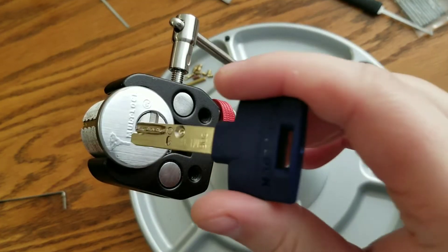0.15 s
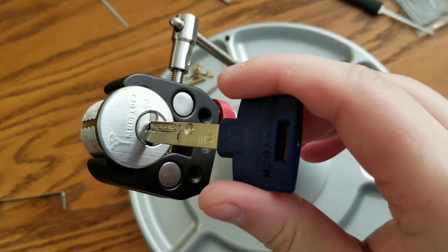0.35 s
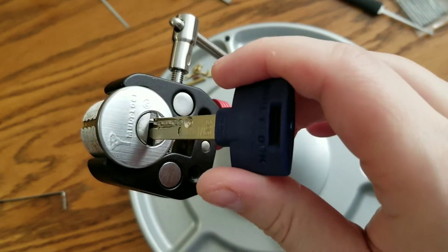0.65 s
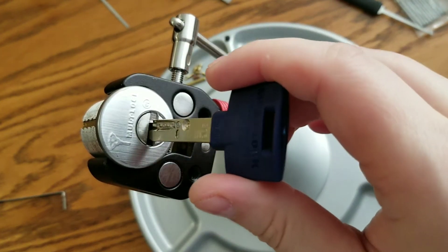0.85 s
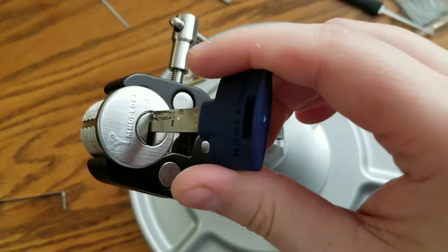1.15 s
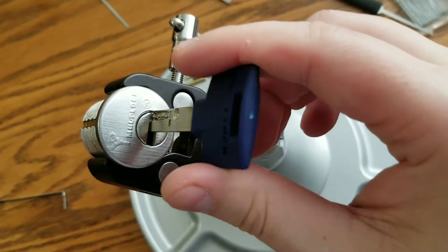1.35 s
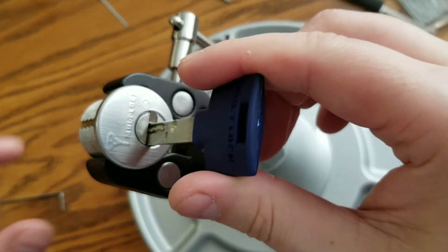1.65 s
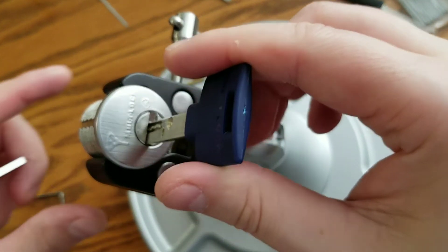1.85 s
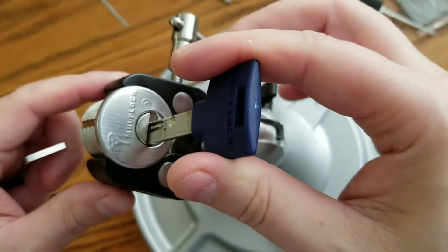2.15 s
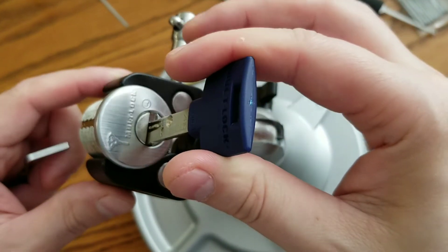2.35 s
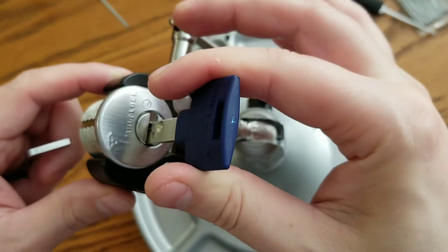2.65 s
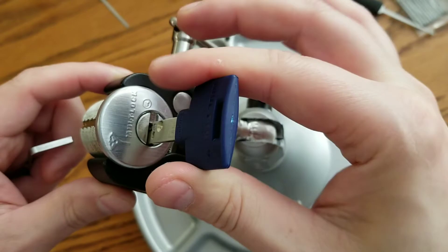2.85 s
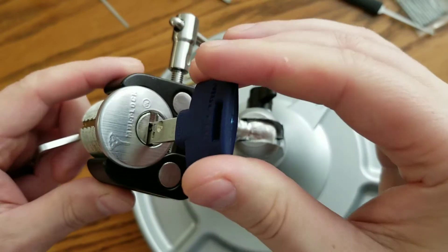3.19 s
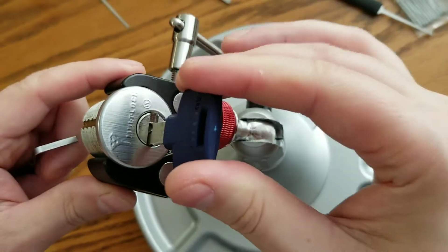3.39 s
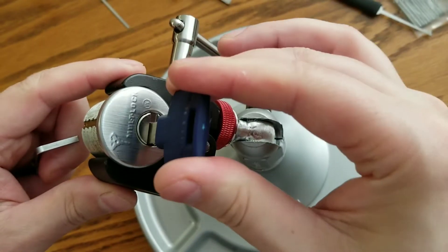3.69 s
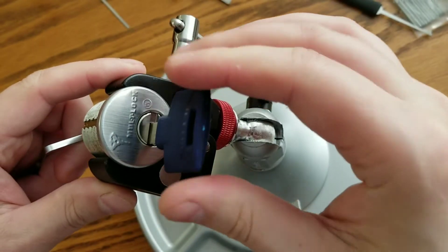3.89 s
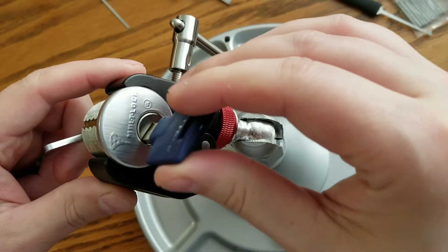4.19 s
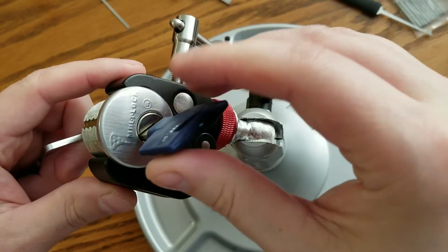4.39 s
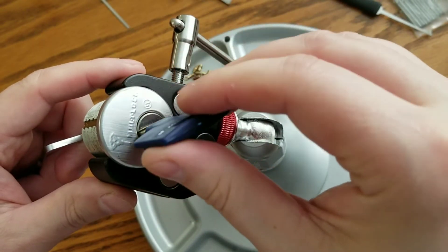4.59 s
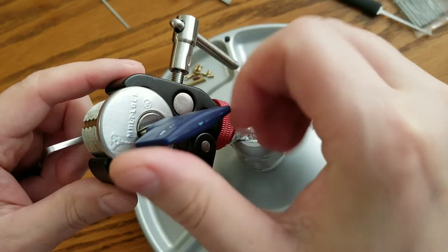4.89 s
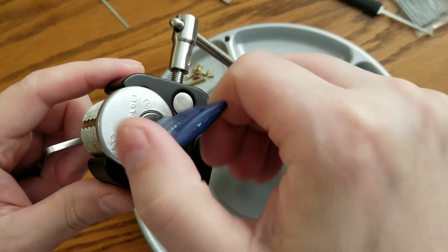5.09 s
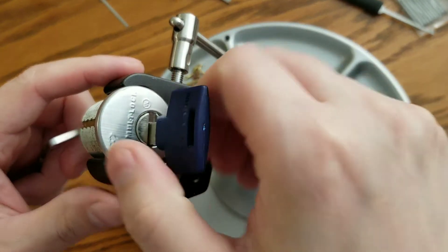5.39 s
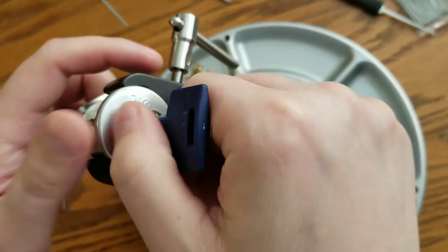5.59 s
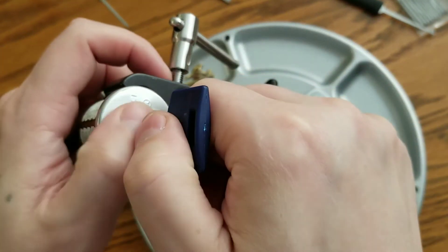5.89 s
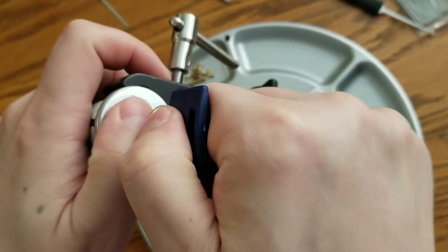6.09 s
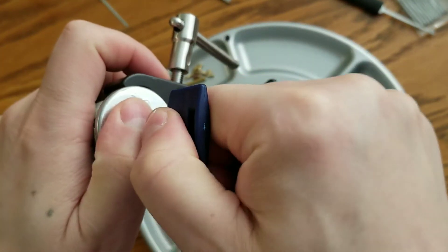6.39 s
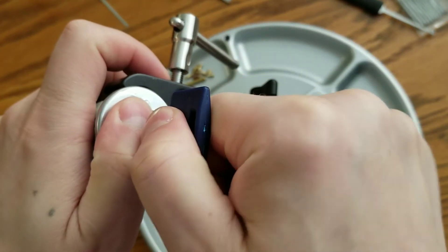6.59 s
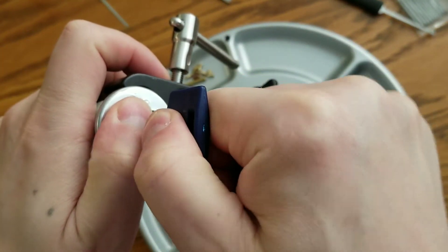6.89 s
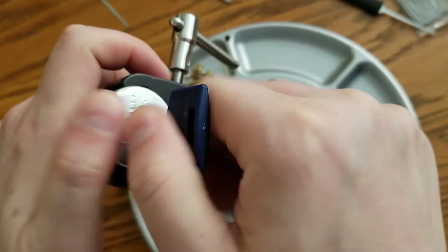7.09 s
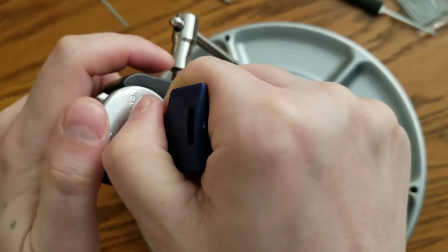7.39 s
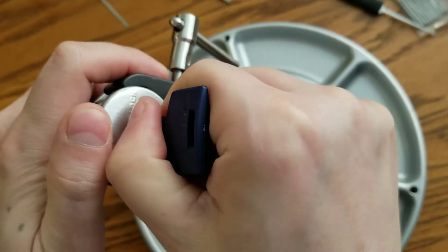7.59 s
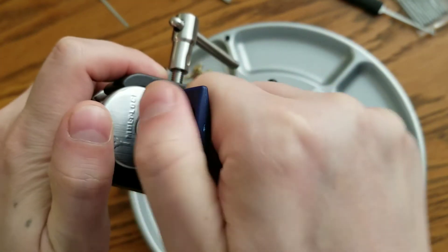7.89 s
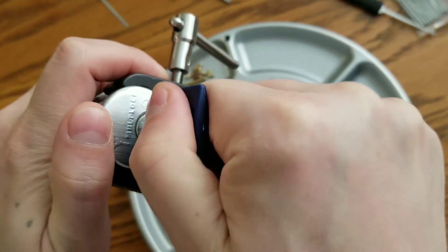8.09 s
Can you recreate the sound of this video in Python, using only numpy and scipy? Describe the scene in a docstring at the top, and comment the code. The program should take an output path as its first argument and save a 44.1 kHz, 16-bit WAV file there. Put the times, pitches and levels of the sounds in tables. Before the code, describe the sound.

Close stereo pickup in a small room: a brass key enters a lock cylinder in a small vise with isolated crisp clicks, then tight bursts of hard metallic snaps and knocks around the middle. Sparse softer ticks and grip creaks follow. Each bright snap has a short room tail; a faint low hum and hiss continue behind.

```python
"""In a small room, a brass key is pushed into a pin cylinder in a small vise, turned and jiggled close by.
Key and pins click as short bursts of damped modes; the vise rings duller and longer and sways on its stand.
Fingers and metal rub as grainy noise, slips creak faintly and a tiny spring pings once.
Decaying noise bands form the room's answer; behind are a low hum, thin whine and hiss,
whose level is raised and lowered along a tabled gain curve."""
import sys
import numpy as np
from scipy import signal
from scipy.fft import rfft, irfft
from scipy.io import wavfile

SR = 44100
rng = np.random.default_rng(int(sys.argv[2]) if len(sys.argv) > 2 else 0)


def generate_wav(sig):
    """Save sig (samples, or channels by samples) to the path in sys.argv[1] as 16-bit PCM at SR."""
    pcm = np.round(np.clip(np.atleast_2d(sig).T, -1, 1) * 32767).astype(np.int16)
    wavfile.write(sys.argv[1], SR, pcm)


N = 363825
TIME = np.arange(N) / SR

# gain curve of the whole background, before BACKGROUND_DB: time_s, level_db
BACKGROUND_GAIN = [(0.0, -52.5), (1.03, -47.5), (2.57, -48.5), (2.87, -53), (3.45, -51.5), (3.7, -59),
                   (5.68, -58), (6.64, -48), (8.25, -47.5)]
# tones of the hum, level relative to the gain curve: frequency_hz, level_db
HUM_TONES = [(59, -12.5), (119, 0), (163, -4.5), (220, -13.5), (296, -15), (1126, -22)]
# relative spectra of the rumble and of the hiss: frequency_hz, density_db
RUMBLE_SPECTRUM = [(20, -26), (45, -7.5), (85, -6.5), (130, -2.5), (210, -5.5), (300, -12), (400, -17),
                   (500, -19), (700, -26), (950, -34.5), (1400, -38.5), (2500, -44.5), (5000, -47),
                   (9000, -62)]
HISS_SPECTRUM = [(1200, -4), (2500, -6), (6300, -6), (8400, -14), (10000, -6), (11800, 0), (14600, -.5)]
# relative spectrum of sliding friction: frequency_hz, density_db
FRICTION_SPECTRUM = [(500, -8.0), (1200, -13.5), (2200, -2.5), (3600, -8.5),
                     (5500, -6.5), (8000, -6.5), (12500, 4), (15000, 0.0)]
# likeness of left and right noise, limited to -1..1 in use: frequency_hz, coherence
COHERENCE = [(60, 0.3), (130, 0.76), (290, 0.88), (640, 0.22), (1400, -1.15), (3000, 0.5)]
# decay and relative strength of the room's reflections: frequency_hz, t60_s, level_db
ROOM_BANDS = [(400, 0.29, 2.5), (1530, .3, 4), (3293, 0.35, 0), (6170, 0.39, 3), (9200, 0.27, -6.5),
              (13930, .3, -2.5)]
# free modes of a small spring, relative levels: frequency_hz, level_db, t60_s
SPRING_MODES = [(9518, -19, .1), (10940, -19, .12), (12590, 0, .1), (14520, -1, .07)]
# the stand sways after a shove, or the key bottoms out in a short low thud; level before decay: start_s,
# pitch_hz, level_db, t60_s
LOW_THUMPS = [(2.595, 132.8, -36.5, 0.45), (3.366, 106.6, -38, .3), (3.421, 129.8, -39.5, 0.24),
              (3.565, 133.7, -31, .24), (3.562, 61.4, -34, 0.051), (4.151, 72, -36.5, 0.063),
              (6.87, 122, -27.5, 0.12)]
# the shifting grip keeps the parts creaking: start_s, end_s, slips_per_s
FIDGETS = [(0.949, 2.058, 10), (7.057, 7.542, 16), (7.755, 8.235, 24)]
# strokes of metal and skin sliding: middle_s, half_length_s, level_db
RUBS = [(1.482, 0.04, -60.5), (2.593, .016, -35), (3.382, 0.017, -40), (3.573, 0.011, -33),
        (5.206, 0.037, -66), (6.14, 0.032, -66.5), (6.427, 0.023, -67.5), (7.123, 0.03, -61.5),
        (7.9, 0.028, -58.5), (7.956, 0.057, -62)]
# modes of the vise clamp and of the cylinder housing, relative levels: frequency_hz, level_db, t60_s
CLAMP_MODES = [(335, -12, .05), (420, -12, .04), (530, -5, .09), (620, 0, .08), (690, -1, .035),
               (770, -6, .025), (848, -6, .06), (935, -5, .03), (1040, -7, .02)]
HOUSING_MODES = [(1400, -14, .04), (1762, -3, .055), (1820, -1, .03), (1920, -2, .03), (2020, -1, .025),
                 (2200, -1, .02), (2440, -2, .02), (2575, -2.5, .035), (2680, -3, .025), (2850, -5, .02),
                 (3090, -9, .025), (3610, -13, .025), (3910, -13, .025)]
# the key rocks in the keyway and knocks dully: start_s, energy_db
KNOCKS = [(0.9614, -33.5), (1.0906, -32), (1.126, -36.5), (1.1635, -33), (1.445, -23), (1.8097, -31),
          (1.9172, -33.5), (2.505, -26.5), (2.523, -27), (2.9735, -31), (3.4477, -22), (3.563, -17),
          (4.162, -25), (5.2235, -25), (5.2565, -29.5), (5.37, -42), (5.665, -39), (5.92, -40),
          (7.0899, -29.5), (7.1129, -26), (7.3851, -29), (7.7853, -36.5), (7.845, -31), (7.872, -31.5),
          (7.9929, -30.5), (8.083, -26), (8.1535, -35)]
# how far the key is in, as a fraction of full depth: time_s, depth
KEY_DEPTH = [(0.3, 0.05), (1.5, 0.14), (2.55, 1), (3.55, 0.95)]
# modes of the key blade and of the pins, relative levels: frequency_hz, level_db, t60_s
BLADE_MODES = [(2920, -14, 0.001), (3850, -1, 0.0024), (5200, 4.5, 0.0045), (6060, -2, 0.015),
               (6840, -1.5, 0.015), (7730, 4, 0.0073), (8900, 4.5, 0.0024), (9970, -2, 0.014)]
PIN_MODES = [(10400, -4, .002), (11400, -3, .002), (12500, 0, .003), (13500, 1, .003), (14300, 4, .003)]
# the key snaps past a pin and jolts the vise: start_s, pin_energy_db, blade_energy_db, vise_energy_db
SNAPS = [(0.3662, -34, -27, -24.5), (0.6382, -8.5, -12, -16.5), (0.9425, -42, -31, -34),
         (1.4381, -27, -33.5, -18), (1.4917, -15, -29.5, -44), (1.4985, -8, -6.5, -16.5),
         (1.5016, -8.5, -16, -25.5), (1.6317, -23, -64, -33), (1.9363, -33, -36.5, -32.5),
         (1.9917, -25.5, -35.5, -32), (2.4874, -30, -34.5, -31), (2.5152, -25.5, -29, -46),
         (2.567, -17, -27, -20), (2.5735, -11, -31, -19.5), (2.5785, -12, -23, -15),
         (2.5927, -8.5, -19.5, -11), (2.6005, -34, -20, -15), (2.9275, -25.5, -32.5, -32),
         (3.3424, 3, -21.5, -19), (3.3537, -10, -17, -27), (3.362, -6, -22, -11.5),
         (3.4181, -11.5, -17, -18.5), (3.422, -5, -20, -8), (3.5441, 1.5, -21, -15),
         (3.5548, -5, -33, -21.5), (4.1496, -15, -37.5, -24), (4.3809, -36, -41.5, -46.5),
         (4.4013, -36.5, -40, -29.5), (4.752, -35, -39.5, -29), (5.0605, -25.5, -37.5, -27),
         (5.229, -20.5, -26.5, -33), (5.532, -30.5, -35, -59.5), (5.5904, -21.5, -24, -62),
         (7.1338, -25.5, -30.5, -29), (7.197, -12, -17, -37)]

BACKGROUND_DB = -5
HUM_PAN_DB, WHINE_PAN_DB, KEY_PAN_DB = -2.8, -8, 7      # positive is louder on the left
SPRING_S, SPRING_DB = 5.788, -27.5
PIN_CONTACT_S, JAW_CONTACT_S = .0009, .005
# housing against clamp: for a snap at zero depth, its rise at full depth, and for a dull knock
MOUTH_HOUSING_DB, DEEP_HOUSING_DB, KNOCK_HOUSING_DB = -6.5, 7, -3.5
PIN_ROOM_DB, BLADE_ROOM_DB = -9.5, -11.5
CUTOFF_HZ = 14650


def from_db(db):
    """Level: decibels become an amplitude gain."""
    return 10 ** (np.asarray(db) / 20)


def rms_one(x):
    """Normalisation: the root mean square becomes 1."""
    return x / np.sqrt(np.mean(x ** 2) + 1e-20)


def unit_energy(x):
    """Normalisation: the energy of each channel becomes 1."""
    return x / np.sqrt(np.sum(x ** 2, axis=-1, keepdims=True) + 1e-20)


def panned(pan_db):
    """Constant-power panning: left and right gains differ by pan_db."""
    return rms_one(from_db([[pan_db / 2], [-pan_db / 2]]))


def at_hz(points, hz, axis=1):
    """Interpolation: a table column is read along a log-frequency axis."""
    points = np.array(points)
    return np.interp(np.log(hz), np.log(points[:, 0]), points[:, axis])


def add(out, s, sound):
    """Superposition: a stereo sound is summed in at time s."""
    start = int(s * SR)
    out[:, start:start + sound.shape[1]] += sound[:, :N - start]


def drift(rate_hz):
    """Low-passed randomness: noise through a double pole at rate_hz wanders smoothly with spread about 1."""
    step = 40      # samples between the values drawn
    pole = np.exp(-2 * np.pi * rate_hz * step / SR)
    slow = signal.lfilter([1], [1, -2 * pole, pole ** 2], rng.standard_normal(N // step + 2002))
    slow = slow[2000:]      # the filter has settled
    return np.interp(np.arange(N) / step, np.arange(len(slow)), rms_one(slow))


def bands(low_hz, size):
    """Band analysis: half-octaves of two-channel noise as (centre Hz, noise), neighbours unrelated."""
    high_hz = 17000
    edges = np.geomspace(low_hz, high_hz, int(2 * np.log2(high_hz / low_hz)) + 1)
    white = rng.standard_normal((2, 2, size))
    for k, (low, high) in enumerate(zip(edges, edges[1:])):
        band_filter = signal.butter(2, [low, high], "band", fs=SR, output="sos")
        yield np.sqrt(low * high), signal.sosfilt(band_filter, white[k % 2])


def two_sides(mid, side, alike):
    """Coherence: common and opposed noise mix so that the two sides are correlated by alike."""
    return np.sqrt(1 + alike) * mid + np.sqrt(1 - alike) * side * [[1], [-1]]


def coloured_noise(spectrum):
    """Spectral shaping: stereo noise takes a given spectrum and the tabled coherence, at rms 1."""
    hz = np.fft.rfftfreq(N, 1 / SR) + 1
    mid, side = rfft(rng.standard_normal((2, N)))
    both = two_sides(mid, side, np.clip(at_hz(COHERENCE, hz), -1, 1))
    return rms_one(irfft(both * from_db(at_hz(spectrum, hz)), N))


def band_of(modes, x):
    """Radiation band: a part radiates from under its lowest mode to over its highest."""
    edges = [.85 * modes[0][0], 1.1 * modes[-1][0]]
    return signal.sosfilt(signal.butter(2, edges, "band", fs=SR, output="sos"), x)


def softened(modes, softness_db):
    """Contact stiffness: a gentle blow loses softness_db per octave above the lowest mode."""
    hz, level_db, t60 = np.transpose(modes)
    return np.column_stack([hz, level_db - softness_db * np.log2(hz / hz[0]), t60])


def strike(modes, contact_s, crack_db, length_s, vary_db, apart):
    """Modal excitation: a blow and its dying chatter drive damped modes and a broad crack, at energy 1."""
    t = TIME[:int(length_s * SR)]
    hz, level_db, t60 = np.transpose(modes)[:, :, None]
    hz = hz * (1 + 0.0068 * rng.standard_normal(hz.shape))      # the grip detunes every mode a little
    # each side hears its own mode strengths and phases
    strength_db = level_db + vary_db * rng.standard_normal((2, len(modes), 1))
    phase = rng.uniform(0, 2 * np.pi, (len(modes), 1)) + apart * rng.standard_normal((2, len(modes), 1))
    decay = from_db(strength_db - 60 * t / t60)
    ringing = np.sum(decay * np.sin(2 * np.pi * hz * t + phase), axis=1)
    ringing *= 1 - np.exp(-t * hz.min())      # the motion builds up over about a cycle
    chatter = rng.standard_normal(len(t)) + apart * rng.standard_normal((2, len(t)))
    force = unit_energy(chatter * np.exp(-t / contact_s)) + .5 * (t == 0)
    ringing = unit_energy(signal.fftconvolve(ringing, force, axes=1)[:, :len(t)])
    crack = unit_energy(band_of(modes, force))
    return unit_energy(ringing + from_db(crack_db) * crack)


def background(rumble_db=3, hiss_db=-20, whine_db=-25, whine_hz=1128, whine_width_hz=45,
               waver_db=1.0, lag_s=0.00014):
    """Common gain: rumble, slightly wavering tones, resonant whine and hiss follow one tabled gain curve."""
    gain = from_db(BACKGROUND_DB + np.interp(TIME, *np.transpose(BACKGROUND_GAIN)))
    tones = 0
    for hz, level_db in HUM_TONES:
        strength = from_db(level_db + waver_db * drift(7.7))
        tones = tones + strength * np.sin(2 * np.pi * hz * TIME + .7 * drift(2.2))
    rumble = from_db(rumble_db) * coloured_noise(RUMBLE_SPECTRUM)
    low = (rumble + np.sqrt(2) * tones) * panned(HUM_PAN_DB)
    low[1] = np.interp(TIME - lag_s, TIME, low[1])      # the hum reaches the left side first
    # noise through two equal resonances in a row
    peak = signal.iirpeak(whine_hz, whine_hz / whine_width_hz / 2, fs=SR)
    once = signal.lfilter(*peak, rng.standard_normal((2, N)))
    whine = from_db(whine_db) * rms_one(signal.lfilter(*peak, once)) * panned(WHINE_PAN_DB)
    hiss = from_db(hiss_db) * coloured_noise(HISS_SPECTRUM) * panned(1.5)
    return gain * (low + whine + hiss)


def room(x, build_s=0.0026, late_db=-23, alike_hz=900):
    """Reverberation: reflections thicken in milliseconds and die by band, over a faint tail twice as long."""
    t = TIME[:SR * 4 // 5]
    response = 0
    for hz, noise in bands(low_hz=200, size=len(t)):
        alike = np.exp(-(hz / alike_hz) ** 2)      # long waves reach both sides together
        noise = two_sides(noise[0], noise[1], alike)
        fall_db = -60 * t / at_hz(ROOM_BANDS, hz)
        decay = from_db(fall_db) + from_db(late_db + fall_db / 2)
        response = response + noise * decay * from_db(at_hz(ROOM_BANDS, hz, axis=2))
    response = unit_energy(response * (1 - np.exp(-t / build_s)))
    return signal.fftconvolve(x, response, axes=1)[:, :N]


def spring_ping():
    """Free vibration: a tiny spring is let go and rings at its own modes."""
    out = np.zeros((2, N))
    ping = strike(SPRING_MODES, contact_s=.0002, crack_db=-20, length_s=.2, vary_db=1, apart=1)
    add(out, SPRING_S, from_db(SPRING_DB) * ping * panned(11.0))
    return out


def stand_thumps(rise_s=0.0017):
    """Damped oscillator: the whole vise sways on its stand, or the key bottoms out with a thud, as single low
    notes."""
    out, t = np.zeros((2, N)), TIME[:SR // 2]
    for s, hz, level_db, t60 in LOW_THUMPS:
        envelope = from_db(level_db - 60 * t / t60) * (1 - np.exp(-t / rise_s))
        add(out, s, envelope * np.sin(2 * np.pi * hz * t) * panned(-1.5))
    return out


def grip_creaks(slip_db=-44.0, clamp_db=1, spread_db=6, contact_s=0.0083, softness_db=5, crack_db=-12):
    """Stick-slip: tiny slips under the fingers come at random and ring housing and clamp faintly."""
    out = np.zeros((2, N))
    soft_housing = softened(HOUSING_MODES, softness_db)
    for start_s, end_s, per_s in FIDGETS:
        count = max(0, round(per_s * (end_s - start_s)))
        for s in rng.uniform(start_s, end_s, count):
            housing = strike(soft_housing, contact_s, crack_db, length_s=.1, vary_db=2, apart=1)
            clamp = strike(CLAMP_MODES, contact_s, crack_db, length_s=.1, vary_db=2, apart=.4)
            level_db = slip_db - spread_db * rng.random()
            add(out, s, from_db(level_db) * (housing + from_db(clamp_db) * clamp))
    return out


def rubbing(grain_db=4):
    """Sliding friction: a bright hiss with random grain follows each short stroke."""
    stroke = sum(from_db(level_db) * np.exp(-((TIME - s) / half_s) ** 2) for s, half_s, level_db in RUBS)
    grain = from_db(grain_db * drift(150))
    return stroke * rms_one(coloured_noise(FRICTION_SPECTRUM) * grain) * panned(3.5)


def vise_blows():
    """Coupling: blows as (s, energy dB, housing against clamp dB); a deeper key drives the housing more."""
    blows = []
    for s, _, _, vise_db in SNAPS:
        depth = np.interp(s, *np.transpose(KEY_DEPTH))
        blows.append((s, vise_db, MOUTH_HOUSING_DB + DEEP_HOUSING_DB * depth))
    return blows + [(s, db, KNOCK_HOUSING_DB) for s, db in KNOCKS]


def vise_knocks(vary_db=1.5, clamp_crack_db=-8, housing_crack_db=-7, soft_db=8.5, hard_db=-24):
    """Energy sharing: clamp and housing split each blow, chatter in the jaws and ring low and long."""
    out = np.zeros((2, N))
    for s, db, lean_db in vise_blows():
        clamp_db = db - 10 * np.log10(1 + from_db(lean_db) ** 2)
        housing_db = clamp_db + lean_db
        # blows weaker than hard_db are softer, fully so 10 dB below it
        softness_db = soft_db * np.clip((hard_db - housing_db) / 10, 0, 1)
        clamp = strike(softened(CLAMP_MODES, softness_db), JAW_CONTACT_S, clamp_crack_db,
                       length_s=.2, vary_db=vary_db, apart=.4)
        housing = strike(softened(HOUSING_MODES, softness_db), JAW_CONTACT_S,
                         housing_crack_db - softness_db / 2, length_s=.2, vary_db=vary_db, apart=1)
        clamp = from_db(clamp_db) * panned(-2.5) * clamp
        housing = from_db(housing_db) * panned(-4.0) * housing
        add(out, s, clamp + housing)
    return out


def key_clicks(blade_contact_s=.0012, crack_db=-6, vary_db=1.5, far_lag_s=.00007,
               lead_in_db=-17, lead_in_growth_s=0.0024):
    """Impact: brass snaps on brass; returns the direct sound and what feeds the room."""
    direct, spread = np.zeros((2, 2, N))
    lead = TIME[:SR // 100]
    # summed over all directions the modes even out to a plain pulse in each part's range
    impulse = lead[None] == 0
    blade_pulse = unit_energy(band_of(BLADE_MODES, impulse))
    pin_pulse = unit_energy(band_of(PIN_MODES, impulse))
    for s, pin_db, blade_db, _ in SNAPS:
        blade = strike(BLADE_MODES, blade_contact_s, crack_db, length_s=.02, vary_db=vary_db, apart=1)
        pins = strike(PIN_MODES, PIN_CONTACT_S, crack_db, length_s=.02, vary_db=vary_db, apart=1)
        click = (from_db(blade_db) * blade + from_db(pin_db) * pins) * panned(KEY_PAN_DB)
        # a short noise swell placed before each click, with the colour of the click
        lead_in = unit_energy(rng.standard_normal((2, len(lead))) * np.exp(lead / lead_in_growth_s))
        add(direct, s - lead[-1], from_db(lead_in_db) * signal.fftconvolve(click, lead_in, axes=1))
        add(direct, s, click)
        # the pin pulse is inverted so that the two bands do not cancel where they overlap
        blade_out = from_db(BLADE_ROOM_DB + blade_db) * blade_pulse
        pin_out = from_db(PIN_ROOM_DB + pin_db) * pin_pulse
        add(spread, s, blade_out - pin_out)
    direct[1] = np.interp(TIME - far_lag_s, TIME, direct[1])      # the right side is farther from the lock
    return direct, spread


def scene(knock_room_db=-9, rub_room_db=-6):
    """Superposition: the lock close by, its sound in the room, and the background."""
    hum = background()
    clicks, click_spread = key_clicks()
    knocks, rubs = vise_knocks(), rubbing()
    into_room = click_spread * panned(2.1) + from_db(knock_room_db) * knocks + from_db(rub_room_db) * rubs
    lock = clicks + knocks + rubs + stand_thumps() + spring_ping() + grip_creaks()
    return hum + room(into_room) + lock


def record(dry):
    """Low-pass filtering: an elliptic filter cuts the top steeply."""
    return signal.sosfilt(signal.ellip(8, .3, 60, CUTOFF_HZ, fs=SR, output="sos"), dry)


dry = scene()
out = record(dry)
generate_wav(out)
```